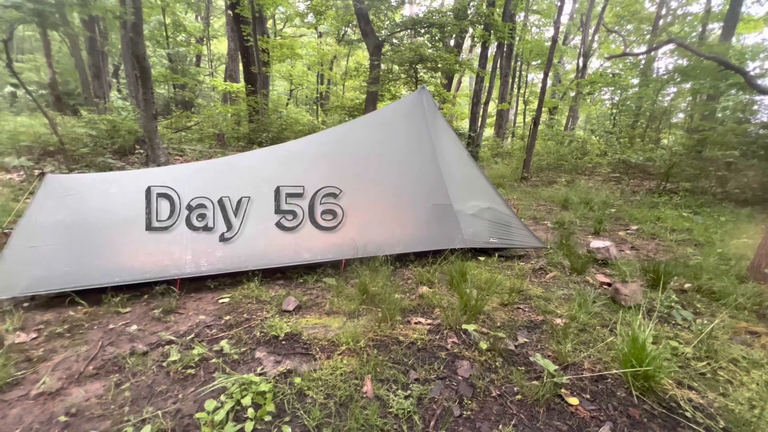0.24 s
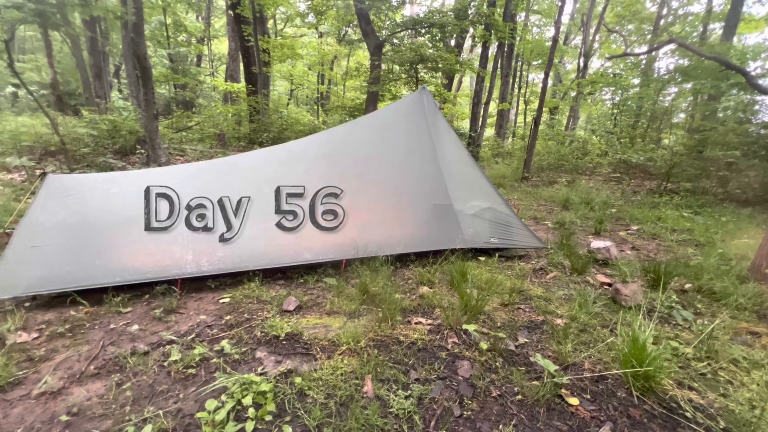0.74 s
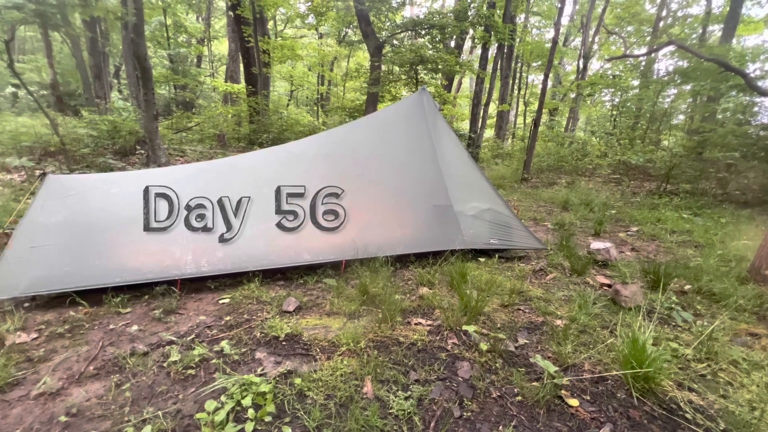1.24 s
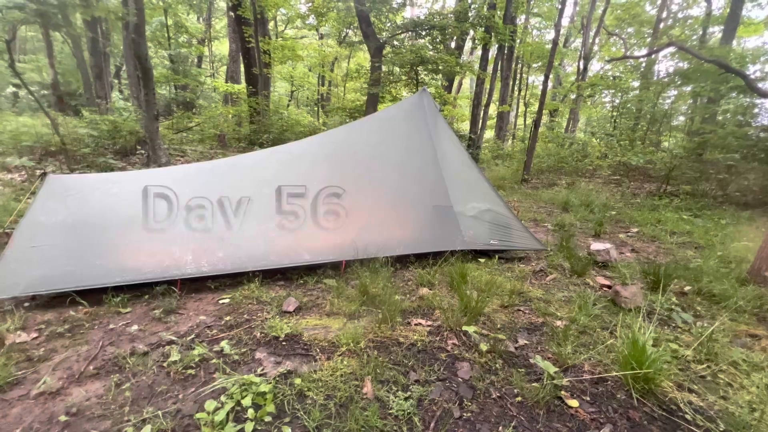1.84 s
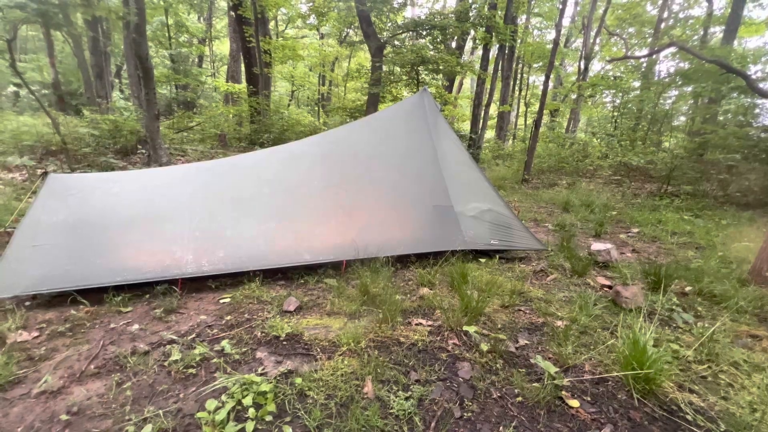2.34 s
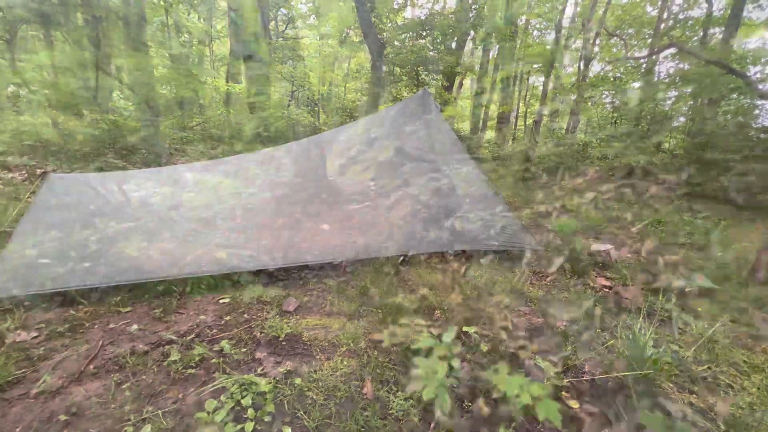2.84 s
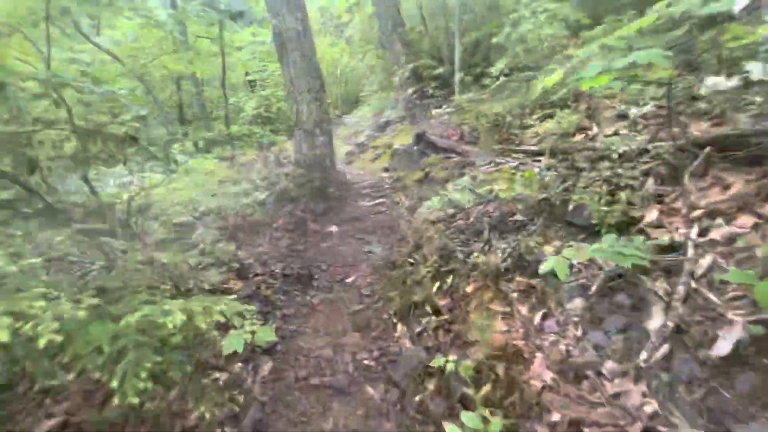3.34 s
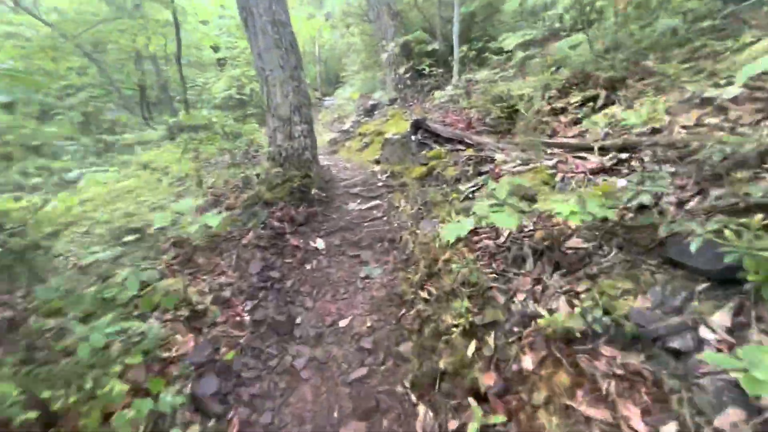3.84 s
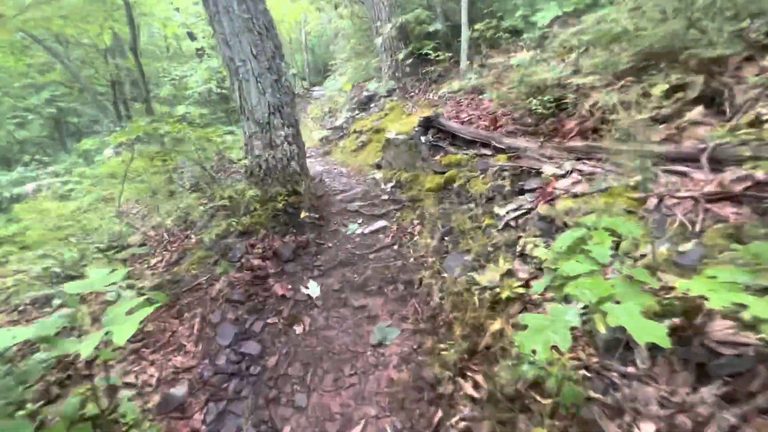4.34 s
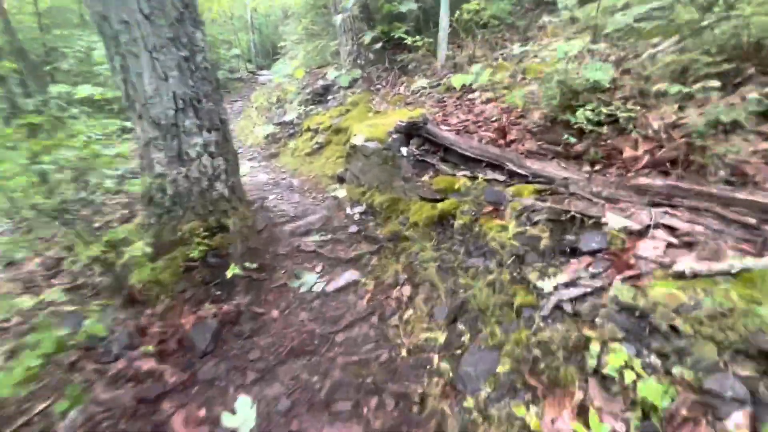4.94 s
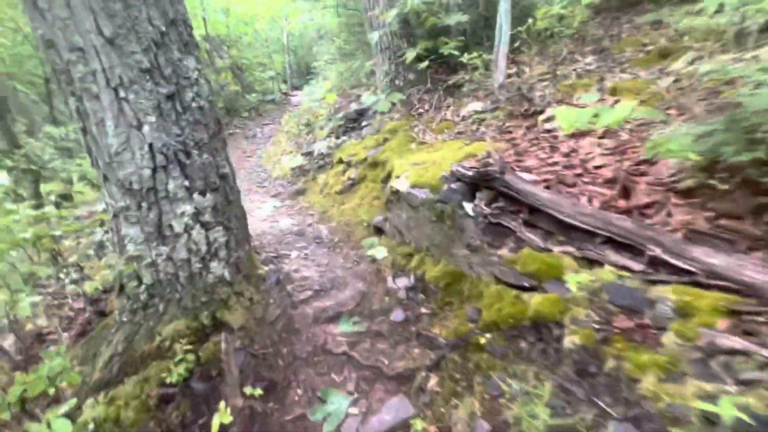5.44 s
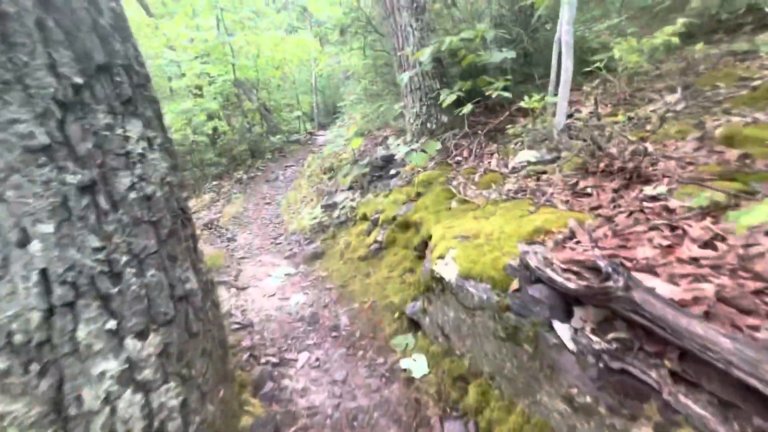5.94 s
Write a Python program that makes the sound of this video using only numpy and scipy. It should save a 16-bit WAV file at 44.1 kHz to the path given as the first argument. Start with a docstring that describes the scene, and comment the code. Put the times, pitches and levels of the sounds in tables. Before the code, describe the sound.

Soft woodland air carries small bird chirps and scattered drips on a tent, echoing lightly among the trees. Halfway through, this gives way to close footsteps on grit and loose stones, with the microphone moving along with the walker. Each stride brings rustling cloth, dull bumps and sometimes a tiny metallic clink from the pack. Two quick clusters of snapping twigs stand out as the loudest sounds before the walking continues.

```python
"""Stray drops tick on a tent and the leaf litter in a damp wood, while songbirds call among the trees.
The camp then gives way to a stony trail, heard from the walker's position: grit crunches under the
boots, soles scrape, loose stones knock and twigs snap close to the microphone. Clothing swishes with
the strides, gear bumps and a metal tag clinks on the pack. A low stir of air lies under both places."""
import sys
import numpy as np
from scipy import signal
from scipy.fft import rfft, irfft
from scipy.io import wavfile

SR = 44100
rng = np.random.default_rng(int(sys.argv[2]) if len(sys.argv) > 2 else 0)


def file_out(sig):
    """Save sig as 16-bit WAV at sys.argv[1]."""
    # one column per channel
    cols = np.atleast_2d(sig).T
    # limit, then scale
    lim = np.clip(cols, -1, 1)
    pcm = np.round(lim * 32767).astype(np.int16)
    wavfile.write(sys.argv[1], SR, pcm)


N = 272097
TIME = np.arange(N) / SR
TRAIL_FADE = np.interp(TIME, (2.35, 3.63), [0, 1])   # brings in the trail's continuous layers
PORT_LAG_S = .00045   # longest delay between the microphone's two ports
# Likeness of left and right on the trail: f/Hz, correlation
TRAIL_LIKENESS = [(60, 0.62), (250, 0.86), (640, 0.48), (1400, 0.34), (3000, 0), (7000, 0.00066)]


def footsteps(heel_rise_s=0.029, push_after_s=0.042, push_rise_s=0.14):
    """A heel lands, then the other foot pushes off: grit crunches, leaves crackle, the ground rumbles."""
    # Strides, in relative levels: t/s, heel crunch/dB, heel rumble/dB, push-off crunch/dB
    steps = [(2.817, -48, -66, -66), (3.366, -45.5, -45, -59.5), (3.88, -53, -67, -63),
             (4.449, -55, -47, -60), (4.981, -48, -45.5, -59), (5.548, -53, -50, -55.5),
             (6.088, -57, -45, -56)]
    crunch_power = rumble_power = from_db(-62) ** 2   # floor between the steps
    for s, heel_db, weight_db, push_db in steps:
        heel = swell(s, heel_rise_s)
        push = from_db(push_db) * swell(s + push_after_s, push_rise_s)
        crunch_power = crunch_power + (from_db(heel_db) * heel) ** 2 + push ** 2
        rumble_power = rumble_power + (from_db(weight_db) * heel) ** 2 + (from_db(4.5) * push) ** 2
    crunch = np.sqrt(crunch_power)
    # Spectrum of crushed grit: f/Hz, relative density/dB
    grit_spectrum = [(100, 5), (250, 7), (500, 6.5), (1300, 8), (2400, -6.5), (4000, 8), (9000, -20),
                     (12000, -27)]
    # Spectrum of the ground under the walker's weight: f/Hz, relative density/dB
    rumble_spectrum = [(25, -39), (50, -2), (80, -3), (150, -15.5), (300, -19.5), (800, -17.5)]
    uneven_load = from_db(2.5 * drift(90) + 1.5)
    grit = crunch * uneven_load * stick_slip() * noise(grit_spectrum, TRAIL_LIKENESS, grain_db=-2.5)
    rumble = np.sqrt(rumble_power) * noise(rumble_spectrum, TRAIL_LIKENESS, grain_db=6.0)
    litter = specks(per_s=47, size_db=-51, band_hz=[1100, 4500])
    leaves = crunch * specks(per_s=99, size_db=-8.0, band_hz=[3000, 15000])
    return TRAIL_FADE * (grit + pebbles(crunch) + rumble + litter + leaves)


def pebbles(load, per_s=260, spread_db=5, ring_cycles=4.5):
    """Small pebbles click at random under the sole, as hard as the load on it; each rings briefly."""
    born = rng.random(N) < per_s / SR
    sizes_db = 5 + spread_db * np.minimum(rng.exponential(1, N), 3) + rng.normal(0, 3, (2, N))
    clicks = born * load * from_db(sizes_db) * rng.choice([-1, 1], N)
    pitches_hz = np.geomspace(900, 3760, 10)
    pitch_index = rng.integers(0, len(pitches_hz), N)
    out = 0
    for k, hz in enumerate(pitches_hz):
        decay = from_db(-60 * hz / (ring_cycles * SR))
        resonator = [1, -2 * decay * np.cos(2 * np.pi * hz / SR), decay * decay]
        out = out + signal.lfilter([.5, 0, -.5], resonator, clicks * (pitch_index == k) + 1e-18)
    return out


def twigs():
    """Twigs snap right beside the microphone, in two quick clusters."""
    # Snaps: t/s, level over 4 ms/dB, centre/Hz, width/octaves, t60/s, left-right/dB
    snaps = [(4.7315, -23, 1060, 0.55, 0.012, 2), (4.7325, -19, 3700, 3.1, 0.019, 3),
             (4.743, -22, 2880, 2, 0.011, 4.5), (4.8832, -21, 3570, 2.3, 0.0051, 2),
             (4.891, -28, 2950, 0.83, 0.025, 22), (4.8962, -23, 2950, 0.43, 0.016, -3),
             (4.9058, -17.5, 3800, 1.5, 0.016, -2.5), (4.9158, -20.5, 1340, 2.8, 0.0098, 14)]
    return contacts(snaps, lag_s=PORT_LAG_S, alike_hz=5500, skirt_db=-5.0, rise=0.16)


def stones():
    """Loose stones knock together underfoot."""
    # Knocks: t/s, level over 4 ms/dB, centre/Hz, width/octaves, left-right/dB
    knocks = [(2.836, -40.5, 950, 1.9, -3), (3.134, -36.5, 1570, 9.9, -1.5), (3.277, -46, 1580, 2.5, -3),
              (3.338, -45.5, 900, 0.9, -6), (3.378, -40, 900, 0.99, 8), (3.395, -33.5, 2600, 3.6, 2),
              (3.405, -31.5, 1246, 1.34, 6), (3.411, -37, 1310, 1.7, -6), (3.422, -33, 2200, 3.3, 1),
              (3.46, -47, 1000, 0.69, -2), (3.493, -47, 1100, 0.75, 2), (3.548, -35.5, 3370, 0.97, 2.5),
              (3.569, -37, 2420, 1.5, 5), (3.79, -40.5, 1680, 2.9, 7), (3.812, -45, 2400, 2.6, -18.5),
              (3.894, -46, 1300, 1.4, 9), (3.918, -43, 1170, 1.6, 13), (3.936, -35.5, 1240, 5.2, -1),
              (3.9435, -33.5, 1090, 1.1, 1), (3.958, -44, 1130, 1.3, 5), (3.967, -44, 1900, 3, 0),
              (3.9748, -33.5, 1260, 0.81, -1), (4.3583, -44.5, 1330, 0.84, -5),
              (4.416, -38.5, 2200, 2.1, -4), (4.967, -46, 1080, 0.82, -2), (5.051, -40.5, 1500, 3.2, -2),
              (5.101, -45, 1190, 1.6, 3), (5.182, -40.5, 1500, 2.3, 4), (5.589, -34, 2600, 0.89, -1),
              (5.7725, -41.5, 1170, 1.5, -5), (5.856, -33, 5500, 0.67, 2), (5.878, -39.5, 1390, 0.85, -4),
              (5.8965, -41.5, 1460, 0.9, -5), (5.997, -46.5, 1040, 1.1, 0)]
    rows = with_decay(knocks, t60=0.0016, s_per_octave=0.0016)
    return contacts(rows, lag_s=.00006, alike_hz=2200, skirt_db=-4.5, rise=0.3)


def scrapes():
    """Soles scrape over the ground in short, grainy bursts."""
    # Scuffs: t/s, level over 4 ms/dB, centre/Hz, width/octaves, left-right/dB
    scuffs = [(2.855, -41.5, 2370, 1.8, -4), (3.38, -34, 1050, 3.7, -3), (3.537, -32, 3000, 0.92, -1),
              (3.57, -39.5, 2255, 1, -14), (3.852, -39, 2170, 3.8, 0), (4.447, -43, 510, 2.6, -2),
              (4.517, -32.5, 2250, 4.1, -3), (4.988, -35.5, 1640, 8.5, 0), (5.555, -40, 694, 2.5, 0),
              (6.098, -35.5, 900, 2.6, -1.5)]
    rows = with_decay(scuffs, t60=0.047)
    return stick_slip() * contacts(rows, lag_s=.00006, alike_hz=2370, skirt_db=-5.0, rise=0.28)


def stick_slip(per_s=420, depth_db=4.5):
    """A sole sticks and slips, breaking its noise into uneven grains; a gain of power 1."""
    return rms_one(from_db(depth_db * np.clip(drift(per_s), -2, 2)))


def clothing(rustle_db=-51, clumps_per_s=70, reflection_db=-18):
    """Cloth rubs at each stride; its reflection off the body adds moving ridges to the spectrum."""
    # Swishes: t of the top/s, level/dB, half-length/s, ridge spacing/Hz
    swishes = [(2.778, -46.5, 0.02, 1520), (2.88, -42, 0.013, 2090), (3.046, -46, 0.039, 2270),
               (3.423, -50, 0.029, 2120), (3.586, -44, 0.044, 2180), (3.89, -43.5, 0.02, 2100),
               (4.135, -40.5, 0.042, 1530), (4.531, -46.5, 0.033, 1570), (4.7, -40.5, 0.05, 1560),
               (5.237, -38, 0.04, 1530), (5.412, -44.5, 0.013, 1540), (5.819, -43.5, 0.076, 1700)]
    # Spectrum of rubbing cloth: f/Hz, relative density/dB
    cloth_spectrum = [(200, -28), (500, -2), (1100, 4.5), (2300, 7.5), (4000, 6), (6500, 9.5), (9300, 8),
                      (12000, 1), (15500, -5)]
    swish_power = sum(from_db(db) ** 2 / (1 + ((TIME - s) / half) ** 2 / 2) ** 3
                      for s, db, half, _ in swishes)
    clumps = rms_one(from_db(3.5 * np.clip(drift(clumps_per_s), -2, 2)))
    rustle = TRAIL_FADE * clumps * from_db(rustle_db)
    rub = noise(cloth_spectrum, TRAIL_LIKENESS, grain_db=1.5)
    spacing_hz = in_time(swishes)[2]
    reflected = np.array([np.interp(TIME - 1 / spacing_hz, TIME, side) for side in rub])
    return np.sqrt(swish_power + rustle ** 2) * rms_one(rub + from_db(reflection_db) * reflected)


def thuds(sag_octaves=0.2, puff_db=-9, lag_s_per_db=-0.74):
    """A blow on soft ground or gear swells into a few low swings that sink in pitch, with a dull puff."""
    # Blows: t/s, peak/dB, pitch/Hz, rise/s, left-right/dB
    blows = [(0.083, -55, 340, 0.0039, 0), (.205, -59, 181, .004, 4), (0.6678, -48.5, 345, .0045, -0.5),
             (1.042, -37, 650, 0.0023, 11), (2.2585, -45, 554, 0.0012, 9),
             (2.5321, -51.5, 241, 0.0031, -0.5), (3.1358, -44, 330, 0.0044, 1),
             (3.379, -41, 572, 0.0076, 0), (3.413, -52, 139, .009, -8), (3.621, -42, 546, 0.0014, -0.5),
             (3.87, -43, 567, 0.0025, 0), (3.892, -39, 506, 0.0018, -3.5), (3.898, -34, 487, 0.0014, -1.5),
             (3.9737, -32, 700, 0.0016, 0.5), (4.449, -44.5, 450, 0.0028, -1),
             (4.457, -49.5, 237, 0.0077, 0), (4.735, -28.5, 330, 0.0029, 1),
             (4.9182, -21, 563, 0.0021, -1.5), (4.922, -41, 169, 0.0087, -2), (5.006, -48, 402, 0.0053, -2),
             (5.051, -40, 650, 0.0023, -0.5), (5.183, -38.5, 656, .002, 1), (5.557, -40, 510, 0.0019, -1),
             (5.566, -40, 290, 0.0046, 0), (5.75, -48, 246, 0.0027, -3.5), (6.105, -40.5, 325, .004, 0),
             (6.108, -50, 125, 0.011, 0)]
    out, t = np.zeros((2, N + SR)), np.arange(SR // 8) / SR
    for s, peak_db, hz, rise_s, pan_db in blows:
        age = t / rise_s
        sinking_hz = hz * 2 ** (sag_octaves * (1 - np.minimum(age, 5)))
        puff = rms_one(filtered(rng.standard_normal(len(t)), hz * np.array([.45, 2.2]), "band"))
        load = age * np.exp(1 - age)
        bump = load ** 2 * sine(sinking_hz) + from_db(puff_db) * load * puff
        lag_s = np.clip(lag_s_per_db * pan_db, -PORT_LAG_S, PORT_LAG_S)
        place(out, [bump, bump], s, peak_db, pan_db, lag_s)
    return out[:, :N]


def metal_tag(tick_hz=7350, tick_octaves=2.5, tick_t60_s=0.0034):
    """A small tag on the pack clinks with the steps: each touch ticks and briefly rings its modes."""
    # Touches: t/s, ring level/dB, tick level/dB, left-right/dB
    touches = [(3.339, -39, -36, -7), (3.841, -50, -34.5, 3), (4.4407, -27, -33, -2),
               (5.158, -27, -34.5, -3), (5.385, -44, -40, 9), (5.553, -32, -36.5, -5.5),
               (5.857, -39, -31, -3)]
    # Modes of the tag: f/Hz, relative level/dB, t60/s
    modes = [(8840, 1.5, 0.011), (9610, 10, 0.009), (10150, 10, 0.0079), (12540, -12.5, 0.0079),
             (15300, -10, 0.0074)]
    rings, t = np.zeros((2, N + SR)), np.arange(SR // 20) / SR
    attack = 1 - np.exp(-t / 0.00096)
    for s, ring_db, _, pan_db in touches:
        at = round(s * SR)
        sides_db = np.array([[pan_db], [-pan_db]]) / 2
        for hz, mode_db, t60 in modes:
            strength = from_db(ring_db + mode_db + sides_db + rng.normal(0, 1.2, (2, 1)))
            phase = 2 * np.pi * (hz * t + rng.random((2, 1)))
            rings[:, at:at + len(t)] += strength * np.sin(phase) * from_db(-60 * t / t60) * attack
    ticks = [(s, db, tick_hz, tick_octaves, tick_t60_s, pan_db) for s, _, db, pan_db in touches]
    return rings[:, :N] + contacts(ticks, lag_s=.00006, alike_hz=2280, skirt_db=12.0, rise=0.23)


def drops():
    """Drops strike the tent and leaves nearby and echo in the wood; fainter ones tick farther off."""
    # Near drops: t/s, level over 4 ms/dB, centre/Hz, width/octaves, left-right/dB
    splashes = [(.081, -47.5, 1580, 8.7, -1), (.31, -53, 3200, 1.2, 0), (.3676, -47, 4930, 0.5, 4),
                (.51, -50, 8000, 2.6, -1), (.6655, -47.5, 1100, 3, 0), (.6705, -41.5, 2100, 1.2, -1),
                (.677, -52, 1200, 3.1, 2), (.737, -52, 9000, 2, -2), (.771, -50, 9000, 2.4, 0),
                (.8216, -39.5, 3880, 1.7, 3), (.8627, -49.5, 4500, 1.2, 2), (.99, -52, 990, 2, 0),
                (1.041, -49, 1253, 2.4, 6), (1.324, -37.5, 7900, 1.5, 1), (1.749, -48.5, 1900, 4.1, 2),
                (2.2585, -33, 3880, 2.1, -1.5), (2.3, -46, 6500, 2.6, -2), (2.3678, -42, 1630, 1.3, -1),
                (2.532, -45.5, 1430, 3.6, 2), (2.724, -43.5, 1480, 2.2, -2)]
    rows = with_decay(splashes, t60=0.0055, s_per_octave=0.001)
    near = contacts(rows, lag_s=0.00022, alike_hz=2550, skirt_db=-1.5, rise=0.13)
    far = specks(per_s=14, size_db=-68.0, band_hz=[900, 8000])
    midrange = filtered(near, [550, 1200], "band")
    return near + far + from_db(-12.0) * wood_echo(near) + from_db(-8) * wood_echo(midrange)


def songbirds():
    """Around the camp, slurred and hoarse notes mix with the thin whistles of a farther bird."""
    # Slurred notes: t/s, length/s, opening/Hz, middle/Hz, closing/Hz, relative level/dB
    slurs = [(.385, 0.12, 4100, 3980, 4040, -56), (.503, 0.041, 3850, 3390, 2510, -47.5),
             (.58, 0.052, 2880, 2805, 3540, -50), (.618, 0.043, 3560, 3680, 3650, -44),
             (1.365, 0.034, 3440, 3810, 2800, -48), (1.39, 0.065, 2580, 3060, 4170, -52.5),
             (1.463, 0.071, 4120, 3680, 3740, -45), (1.55, 0.041, 2760, 2564, 2850, -52),
             (1.56, 0.087, 3950, 3660, 2620, -46.5), (1.592, .033, 2950, 3300, 3370, -48),
             (1.63, 0.042, 2850, 2620, 2850, -46), (1.645, 0.045, 2900, 3550, 3300, -46),
             (2.556, 0.047, 3080, 3620, 3290, -52), (2.618, 0.05, 2640, 2860, 2900, -56),
             (2.675, 0.04, 2900, 2980, 3020, -55)]
    # Hoarse, airy notes: same columns
    buzzes = [(0, 0.11, 4430, 4670, 4770, -57.5), (.22, 0.11, 4150, 4280, 4680, -56),
              (.4, 0.18, 3870, 3825, 3760, -53.5), (.625, 0.06, 3970, 4050, 4320, -53),
              (1.44, 0.042, 4100, 4530, 4420, -55), (1.565, 0.072, 4450, 4630, 4300, -57.5)]
    # The farther bird's whistles: same columns
    whistles = [(.285, 0.083, 4800, 4850, 4760, -50), (.37, 0.18, 4800, 4790, 4880, -51.5),
                (.69, 0.034, 4220, 4200, 4270, -52), (.76, 0.053, 4160, 4320, 4300, -56),
                (.865, 0.16, 4300, 4300, 4270, -54.5)]
    return (from_db(-7.5) * bird(slurs, waver=.023, flutter_db=3.5, echo_db=-1)
            + from_db(-5.5) * bird(buzzes, waver=.065, flutter_db=3.5, echo_db=3)
            + from_db(-9.0) * bird(whistles, waver=.014, flutter_db=4.0, echo_db=-5))


def bird(notes, waver, flutter_db, echo_db):
    """Each note is one fluttering arc of pitch, reaching the microphone through the trees."""
    voice = np.zeros(N)
    unsteady = 1 + waver * drift(500)
    flutter = rms_one(from_db(flutter_db * np.clip(drift(70), -1.5, 1.5)))
    for s, length, opening, middle, closing, level_db in notes:
        along = np.clip((TIME - s) / length, 0, 1)
        hz = np.polyval(np.polyfit([0, .5, 1], [opening, middle, closing], 2), along)
        gate = np.clip(np.minimum(along, 1 - along) * length / 0.0024, 0, 1)   # 2.4 ms edges
        voice += gate * flutter * from_db(level_db) * np.sqrt(2) * sine(hz * unsteady)
    return foliage(voice) + from_db(echo_db) * wood_echo(voice)


def buffets(rise_s=0.044, band_hz=(52, 107)):
    """As the walker swings forward, air buffets each microphone port with its own low rumble."""
    # Forward swings: t/s, level/dB
    swings = [(3.38, -55), (3.92, -70), (4.46, -63), (4.58, -59), (5.17, -63), (5.6, -65)]
    strength = sum(from_db(db) * swell(s, rise_s) ** 2 for s, db in swings)
    return strength * rms_one(filtered(rng.standard_normal((2, N)), band_hz, "band"))


def woodland_air():
    """Distant leaves and a low stir of air, easing a little as the walk begins."""
    # Loudness of the air: t/s, level/dB
    levels = [(0, -56), (1, -57), (2, -57), (2.5, -58), (3, -61.5), (3.4, -59.5)]
    # Its spectrum: f/Hz, relative density/dB
    spectrum = [(22, -33), (40, -11), (62, -1), (100, -5), (190, -16.5), (380, -21), (800, -14.5),
                (1800, -17.5), (3500, -12), (6500, -12.5), (9000, -17), (15000, -29.5)]
    # Its likeness left and right: f/Hz, correlation
    likeness = [(60, 0.75), (130, 0.57), (290, 0.49), (640, -0.22), (1400, 0.1), (3000, -0.071)]
    return from_db(in_time(levels)[0]) * noise(spectrum, likeness, grain_db=2.5)


def foliage(x, decay_s=.014, spray_db=-10):
    """Leaves along the way add a spray of early reflections that blur a note."""
    t = np.arange(SR // 10) / SR
    spray = rms_one(rng.standard_normal((2, len(t))) * np.exp(-t / decay_s)) / np.sqrt(len(t))
    reflections = signal.fftconvolve(x[None], spray, axes=1)[:, :N]
    return (x + from_db(spray_db) * reflections) / np.hypot(1, from_db(spray_db))


def wood_echo(x, t60=0.72):
    """Trunks scatter sound into a dense dying tail, different on each side."""
    t = np.arange(SR) / SR
    build_up = 1 - np.exp(-t / .018)
    tail = rng.standard_normal((2, SR)) * from_db(-60 * t / t60) * build_up
    return signal.fftconvolve(np.atleast_2d(x), rms_one(tail) / np.sqrt(SR), axes=1)[:, :N]


def contacts(rows, lag_s, alike_hz, skirt_db, rise):
    """Each contact is a burst of micro-fractures in its own band, with a broad skirt and a faint tail."""
    out, t = np.zeros((2, N + SR)), np.arange(SR // 6) / SR
    tail = from_db(-27 - 60 * t / .09)
    for s, level_db, hz, octaves, t60, pan_db in rows:
        shared, left, right = rng.choice([-1, 1], (3, len(t)))
        # long waves reach both sides alike, short ones scatter
        burst = filtered(shared, alike_hz, "low") + filtered(np.array([left, right]), alike_hz, "high")
        attack = 1 - np.exp(-(t / (rise * t60)) ** 2)
        burst = burst * attack * (from_db(-60 * t / t60) + tail)
        edges_hz = hz * 2 ** (np.array([-.5, .5]) * np.clip(octaves, .5, 6))
        core = rms_one(filtered(burst, edges_hz, "band"))
        skirt = rms_one(filtered(burst, edges_hz * [.5, 2], "band", order=1))
        hit = np.array([rms_one(side) for side in core + from_db(skirt_db) * skirt])
        hit *= np.sqrt(.004 * SR / len(t))   # the energy of 4 ms at power 1
        place(out, hit, s, level_db, pan_db, lag_s)
    return out[:, :N]


def with_decay(rows, t60, s_per_octave=0):
    """Give contacts of one kind a decay time; broad, crumbling ones last s_per_octave longer."""
    return [(s, db, hz, octaves, t60 + s_per_octave * octaves, pan) for s, db, hz, octaves, pan in rows]


def specks(per_s, size_db, band_hz):
    """Tiny random ticks, a few large among many small."""
    born = rng.random(N) < per_s / SR
    sizes = from_db(size_db + 5 * np.minimum(rng.exponential(1, N), 3) + rng.normal(0, 2, (2, N)))
    t = np.arange(SR // 100) / SR
    snap = filtered(rng.standard_normal((2, len(t))) * np.exp(-t / 0.00022), band_hz, "band", order=1)
    return signal.fftconvolve(born * sizes, snap, axes=1)[:, :N]


def noise(spectrum, likeness, grain_db):
    """Stereo noise of rms 1; uneven sizes of its tiny impulses make it grainy."""
    hz = np.fft.rfftfreq(N, 1 / SR)
    sizes = from_db(grain_db * np.clip(drift(700), -2, 2))
    mid, side = rfft(rng.standard_normal((2, N)) * sizes)
    alike = np.clip(at_hz(likeness, hz), -1, 1)
    pair = np.sqrt(1 + alike) * mid + np.sqrt(1 - alike) * side * [[1], [-1]]
    return rms_one(irfft(pair * from_db(at_hz(spectrum, hz)), N))


def place(out, pair, s, level_db, pan_db, lag_s):
    """Add a panned stereo event at time s, its right side shifted by lag_s."""
    pan = rms_one(from_db([pan_db / 2, -pan_db / 2]))
    for side, delay in enumerate([0, lag_s]):
        at = max(round((s + delay) * SR), 0)
        out[side, at:at + len(pair[side])] += from_db(level_db) * pan[side] * pair[side]


def swell(s, rise_s):
    """A load that builds up from time s, tops at 1 and eases off."""
    age = np.maximum(TIME - s, 0) / rise_s
    return age * np.exp(1 - age)


def drift(per_s):
    """A random curve through per_s normal draws a second."""
    knots = rng.standard_normal(N // 16)
    return np.interp(TIME * per_s, np.arange(len(knots)), knots)


def sine(hz):
    """A tone that follows a pitch curve."""
    return np.sin(2 * np.pi * np.cumsum(hz) / SR)


def filtered(x, hz, kind, order=2):
    """Butterworth filter."""
    return signal.sosfilt(signal.butter(order, np.clip(hz, 15, .47 * SR), kind, fs=SR, output="sos"), x)


def in_time(rows):
    """One curve per column after the time column, sample by sample."""
    s, *columns = np.transpose(rows)
    return [np.interp(TIME, s, column) for column in columns]


def at_hz(points, hz):
    """Read a table on a log-frequency axis."""
    knots_hz, values = np.transpose(points)
    return np.interp(np.log(hz + 1), np.log(knots_hz), values)


def from_db(db):
    """Decibels to gain."""
    return 10 ** (np.asarray(db) / 20)


def rms_one(x):
    """Scale to unit power."""
    return x / np.sqrt(np.mean(x ** 2) + 1e-20)


def scene():
    """The camp gives way to the trail, where the sharp sounds echo faintly off the trunks."""
    camp = woodland_air() + drops() + songbirds()
    walker = clothing() + footsteps() + metal_tag()
    knocks = stones() + scrapes() + twigs()
    return camp + walker + knocks + from_db(-29) * wood_echo(knocks) + thuds() + buffets()


def record(dry):
    """The microphone ports notch and dull the treble; the deepest bass and the top are cut off."""
    # Colour common to both ports: f/Hz, gain/dB
    colour = [(2000, 2), (2700, 2.5), (3700, -3.5), (4800, -3), (5300, -5.5), (5650, -3.5), (6900, -4),
              (7600, -10), (8050, -2), (9000, -1), (10100, -4.5), (11400, -17), (13200, -9), (16000, -17)]
    # Balance between the ports: f/Hz, left-right/dB
    balance = [(100, 1.5), (700, 2), (2400, -1), (4400, 6), (8000, 2.5), (15000, -2)]
    hz = np.fft.rfftfreq(2 * N, 1 / SR)
    ports_db = at_hz(colour, hz) + at_hz(balance, hz) * [[.5], [-.5]]
    coloured = irfft(rfft(dry, 2 * N) * from_db(ports_db))[:, :N]
    top_cut = signal.cheby2(16, 70, 16900, fs=SR, output="sos")
    return signal.sosfilt(top_cut, filtered(coloured, 40, "high"))


dry = scene()
out = record(dry)
file_out(out)
```